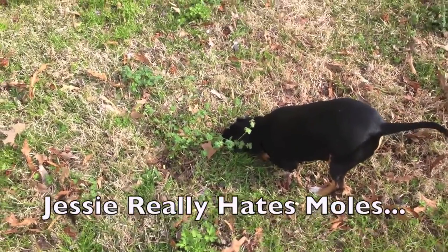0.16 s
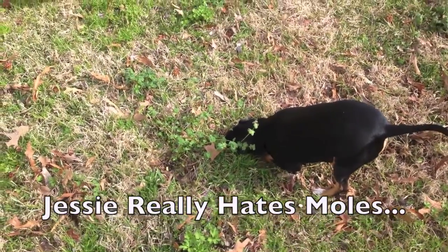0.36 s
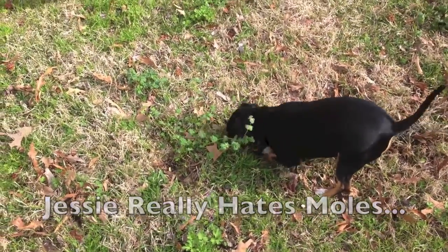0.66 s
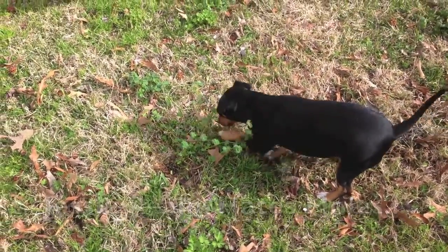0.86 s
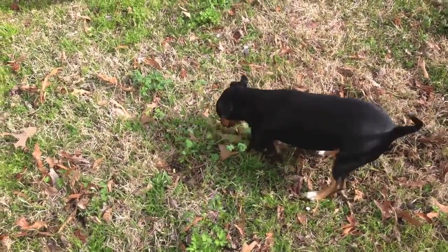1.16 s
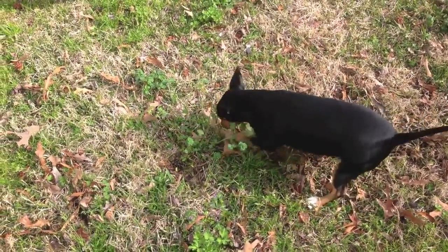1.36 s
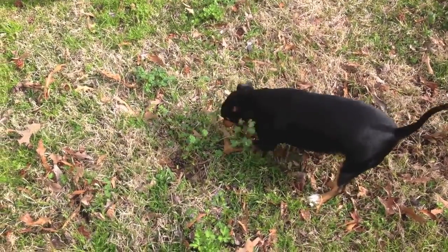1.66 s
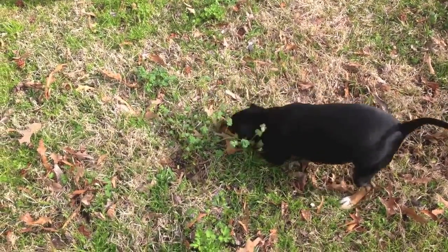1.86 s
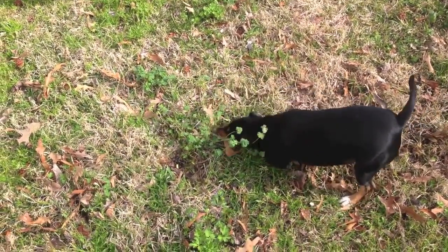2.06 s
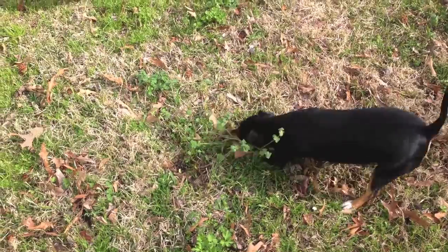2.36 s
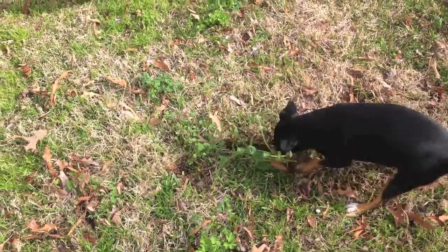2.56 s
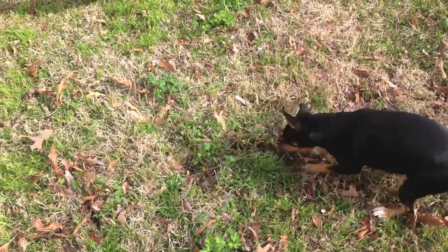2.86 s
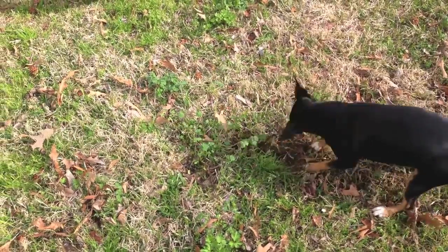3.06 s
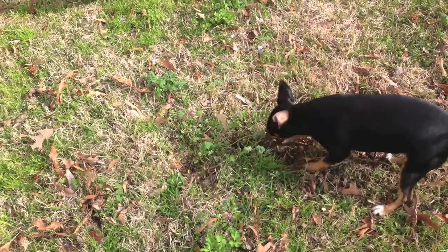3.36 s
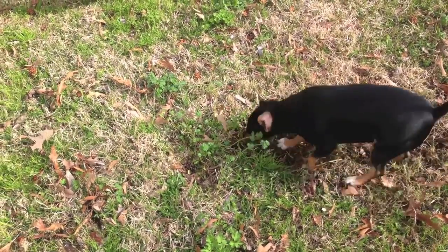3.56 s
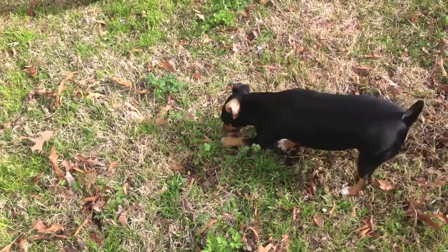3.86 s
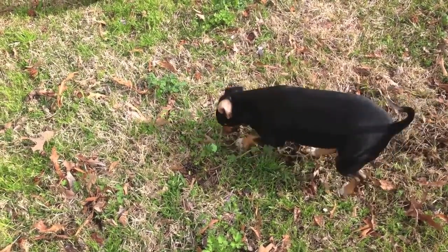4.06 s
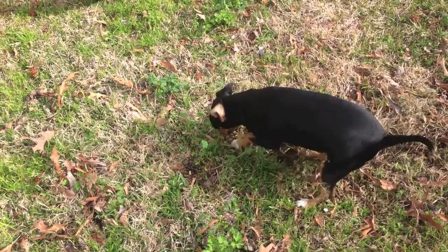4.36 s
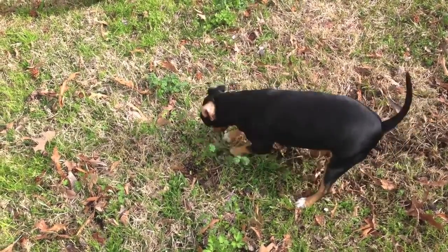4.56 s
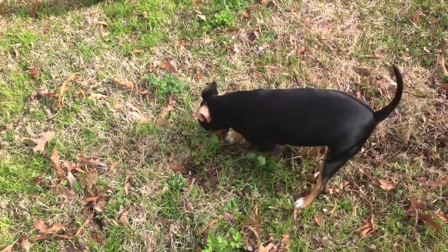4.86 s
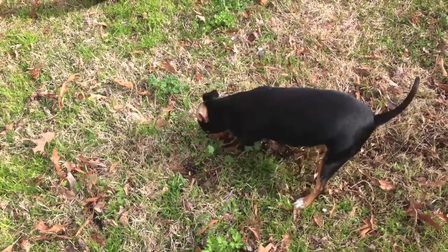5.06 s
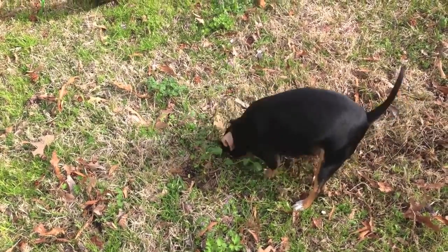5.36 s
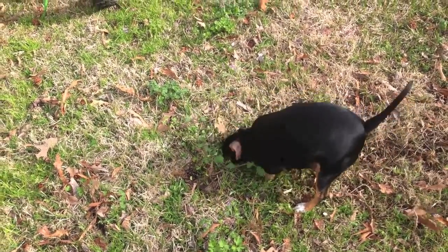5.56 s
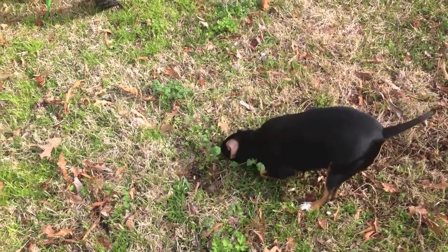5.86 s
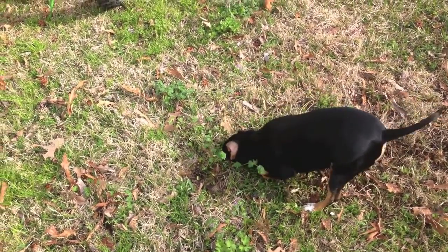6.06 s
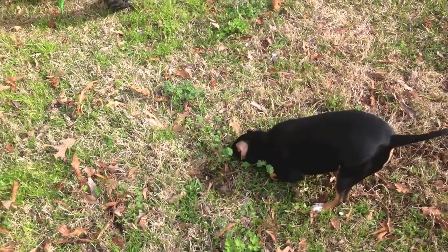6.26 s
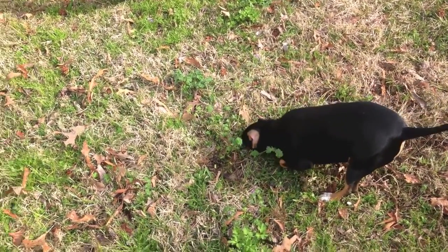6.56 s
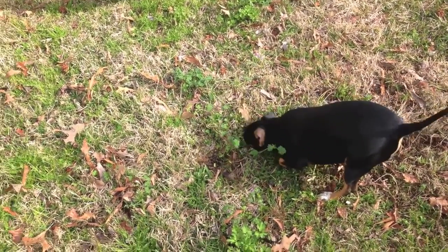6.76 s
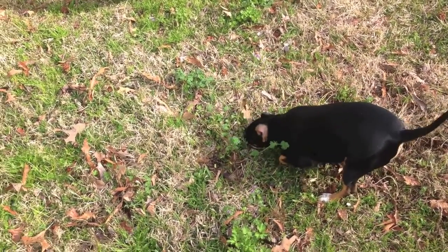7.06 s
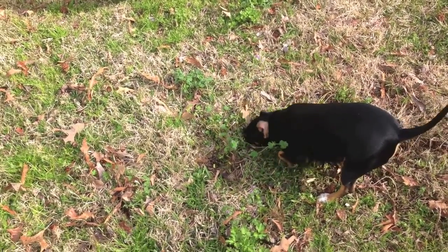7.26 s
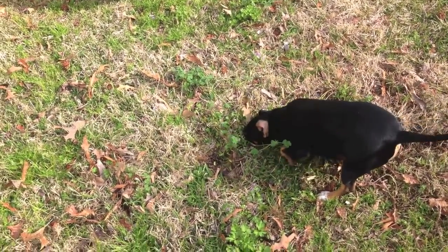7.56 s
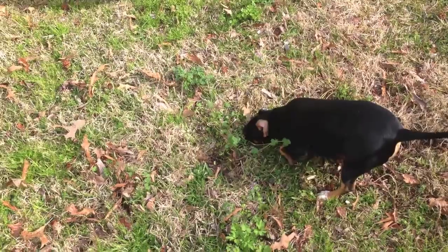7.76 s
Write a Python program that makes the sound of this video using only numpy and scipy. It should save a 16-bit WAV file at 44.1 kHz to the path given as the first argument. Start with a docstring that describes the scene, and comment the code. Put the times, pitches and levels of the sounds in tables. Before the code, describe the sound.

Outdoors on a lawn, with quiet distant birdsong and a low rumble of town behind, a small dog snorts once through its nose. Light, irregular digging follows close to the microphone: dry leaves rustle and crackle, little roots snap and paws bump the earth. The scratching dies down, and a soft sniff leads to a second, more muffled snort into the ground.

```python
"""Birds call from afar over a low town rumble throughout. A small dog snorts at a dry lawn: turbulent air
hisses through the nose while a soft flap, beating about sixty times a second, excites its resonances.
Then the dog digs: paws rake dry leaves into friction noise and tiny fractures, snap stems and thud on
the soil. Near the end it sniffs softly and snorts again, duller now with its nose in the hole."""
import sys
import numpy as np
from scipy import signal
from scipy.fft import rfft, irfft, next_fast_len
from scipy.io import wavfile

SR = 44100
rng = np.random.default_rng(int(sys.argv[2]) if len(sys.argv) > 2 else 0)


def master(y):
    """Save y as 16-bit WAV."""
    cut = np.clip(np.atleast_2d(y).T, -1, 1)
    pcm = np.round(cut * 32767)  # scale
    wavfile.write(sys.argv[1], SR, pcm.astype(np.int16))


N = 348594


def amp(db):
    """Decibels as an amplitude ratio."""
    return 10 ** (np.asarray(db) / 20)


def unit_rms(x):
    """Normalisation to an rms of 1."""
    return x / np.sqrt(np.mean(x ** 2) + 1e-20)


def envelopes(rows):
    """Linear interpolation of each dB column over time; -120 dB beyond the table's ends."""
    times, *columns = np.transpose(rows)
    return [np.interp(np.arange(N) / SR, times, db, -120, -120) for db in columns]


def colour(x, spectrum):
    """Spectral shaping by a curve of dB over log frequency; the result has an rms of 1."""
    size = next_fast_len(N)
    hz, db = np.transpose(spectrum)
    bin_hz = np.maximum(np.arange(size // 2 + 1) * SR / size, 1)
    gain = amp(np.interp(np.log(bin_hz), np.log(hz), db, -90, -90))
    return unit_rms(irfft(rfft(x, size) * gain, size)[:N])


def drift(rate_hz):
    """Random modulation: unit Gaussian values joined by lines, two per cycle of the rate."""
    count = int(N / SR * rate_hz * 2) + 2
    return np.interp(np.arange(N), np.linspace(0, N, count), rng.standard_normal(count))


def add(out, start_s, sound):
    """Superposition of a short sound at a given time."""
    at = round(start_s * SR)
    out[at:at + len(sound)] += sound[:N - at]


def ring(hz, t60_ms, length_s=.03):
    """The impulse response of one mode: an exponentially damped sine."""
    t = np.arange(round(length_s * SR)) / SR
    return np.sin(2 * np.pi * hz * t) * amp(-60 * t / (t60_ms / 1000))


# Spectra of the air and the town. Each row: frequency in Hz, relative density in dB.
AIR_SPECTRUM = [(88, -29), (150, -2), (267, -8.5), (294, -5.5), (802, -14), (1180, -18.5), (2360, -18),
                (2650, -19.5), (3210, -17.5), (15000, -22)]
RUMBLE_SPECTRUM = [(20, -32), (33, -12), (44, -2), (54, 7), (62, 2.5), (110, -3), (160, -13), (210, -17.5),
                   (320, -18.5), (420, -31)]
# Course of the rumble. Each row: time in seconds, level in dB.
RUMBLE_ENVELOPE = [(0.0, -64.5), (1.06, -55), (2.29, -60), (2.44, -57), (5.7, -57.5), (6.25, -66),
                   (7.91, -57)]
def air_and_town(air_db=-66.5):
    """Amplitude-modulated noise: nearly steady outdoor air and an uneven far rumble."""
    air = amp(air_db + .2 * drift(2.9)) * colour(rng.standard_normal(N), AIR_SPECTRUM)
    swell = amp(envelopes(RUMBLE_ENVELOPE)[0] + 1.77 * drift(14))
    return air + swell * colour(rng.standard_normal(N), RUMBLE_SPECTRUM)


# Faint phrases of song. Each row: start, loudest moment and end in seconds, level in dB,
# centre in Hz, wander as a fraction of the centre, width in Hz.
SONG_PHRASES = [(1.85, 2.5, 3.5, -71.5, 1760, .025, 140), (3.0, 3.6, 3.85, -72, 1680, 0.01514, 100),
                (7.53, 7.65, 7.8, -75, 1700, 0.035, 140), (0, 0.15, .22, -69, 4200, .065, 500),
                (2, 2.6, 3.23, -63, 4220, .08, 700)]
def far_birdsong(edge_db=-10.5):
    """Random amplitude modulation spreads each wandering tone into a narrow band that swells and fades."""
    out, t = 0, np.arange(N) / SR
    for start, loudest, end, db, hz, wander, width_hz in SONG_PHRASES:
        from_peak = np.interp(t, [start, loudest, end], [1, 0, 1], 9, 9)
        phase = 2 * np.pi * np.cumsum(hz * (1 + wander * drift(11))) / SR
        swell = amp(db + edge_db * from_peak ** 2 + 1.5 * drift(15))
        out = out + swell * drift(width_hz) * np.sin(phase)
    return out


# Contours of three calls. Each row: time into the note in seconds, pitch in Hz, relative level in dB.
CHIP_CONTOUR = [(0, 2150, -16), (.012, 2300, -5), (.027, 2450, 0), (.045, 2500, -6), (.06, 2480, -20)]
WHISTLE_CONTOUR = [(0, 7000, -12), (.02, 7040, -3), (.07, 7140, -6), (.1, 7080, -8), (.12, 6970, -18)]
SLUR_CONTOUR = [(0, 4750, -14), (.015, 4300, -2), (.055, 3600, 0), (.105, 3120, -2), (.14, 2900, -3),
                (.155, 2900, -20)]
# Notes sung on those contours. Each row: start in seconds, level in dB, pitch factor.
CHIP_NOTES = [(.08, -75, .96), (.37, -74, .98), (1.835, -70, .95), (4.152, -60, 1.01), (4.428, -60.5, 1.01),
              (4.7, -61.5, .97), (5.256, -60.5, .99), (5.523, -62, .99), (5.8, -60, .99),
              (6.105, -61.5, 1.001)]
WHISTLE_NOTES = [(1.69, -69, 1.03), (1.761, -67, 1.01), (6.815, -66.5, 1.001)]
SLUR_NOTES = [(2.08, -71, 1.04), (2.51, -69, 1.01), (2.925, -67, 1.04), (3.36, -63, .99),
              (3.803, -62.5, 1.01)]
def bird_calls(near_t60_s=.065, tail_t60_s=.9):
    """Frequency-modulated sines, smeared by near reflections and a faint tail from houses and trees."""
    calls, waver = np.zeros(N), 1 + .016 * drift(150)
    for contour, notes in [(SLUR_CONTOUR, SLUR_NOTES), (CHIP_CONTOUR, CHIP_NOTES),
                           (WHISTLE_CONTOUR, WHISTLE_NOTES)]:
        times, hz, db = np.transpose(contour)
        t = np.arange(0, times[-1], 1 / SR)
        for start, level_db, factor in notes:
            pitch_hz = factor * waver[round(start * SR):][:len(t)] * np.interp(t, times, hz)
            phase = 2 * np.pi * np.cumsum(pitch_hz) / SR
            add(calls, start, np.sqrt(2) * amp(level_db + np.interp(t, times, db)) * np.sin(phase))
    calls *= amp(1.5 * drift(50))
    t = np.arange(round(.5 * SR)) / SR
    decay = amp(-60 * t / near_t60_s) + amp(-10 - 60 * t / tail_t60_s)
    echoes = rng.standard_normal(len(t)) * decay
    echoes /= np.sqrt(np.sum(echoes ** 2))
    return .6 * calls + .8 * signal.fftconvolve(calls, echoes)[:N]


# Stems and roots breaking. Each row: time in seconds, peak in dB, ring in Hz, relative crack level in dB.
STEM_BREAKS = [(0.3078, -43.5, 3730, -15), (1.068, -38, 3680, -17), (1.0809, -34.5, 8600, -14),
               (1.2133, -30, 3700, -12), (1.344, -36, 1380, -1), (1.455, -31.5, 3670, -14),
               (1.474, -31, 5200, 4), (1.4899, -32, 2920, -12), (1.5919, -29.5, 3540, -15),
               (1.6079, -27, 3460, -11), (1.725, -38.5, 2760, -13), (2.4034, -25.5, 1240, 0.5),
               (2.4125, -37, 1610, -17), (2.4249, -29, 5200, -10), (2.4677, -20, 3830, -8),
               (2.7162, -38, 5960, -2), (3.0286, -37, 1040, -24), (3.2475, -50.5, 1150, -23),
               (3.6997, -37, 12420, -5.5), (4.034, -34.5, 1230, -2.5), (4.424, -36, 3530, -13),
               (4.456, -25.5, 4600, 8), (4.4688, -33.5, 1680, -2), (4.6436, -21.5, 5200, -2),
               (4.9068, -30.5, 1290, 2), (4.99, -33, 2830, -17), (5.1466, -35.5, 2740, -16),
               (5.1641, -39, 2710, -15), (5.7332, -38, 4930, -8)]
def snaps():
    """Brittle fracture of stems, roots and leaf ribs: a brief ring, a bright crack, a splintering tail."""
    out, t = np.zeros(N), np.arange(600) / SR
    breaks = STEM_BREAKS + leaf_rib_breaks()
    band = signal.butter(1, [2500, 10000], "band", fs=SR, output="sos")
    noises = signal.sosfilt(band, rng.standard_normal((len(breaks), len(t))))
    crack_and_tail = np.exp(-t / .00045) + amp(-12.5) * np.exp(-t / .0041)
    soil_knock = amp(-18.5) * ring(490, 5.3, len(t) / SR)
    for (s, db, hz, crack_db), noise in zip(breaks, noises):
        onset = 1 - np.exp(-t * hz * 3)   # builds over a third of a cycle
        tone = onset * ring(hz, 7000 / hz + .28, len(t) / SR)
        sound = tone + amp(crack_db) * noise * crack_and_tail + soil_knock
        add(out, s - .19 / hz, amp(db) * sound / np.max(np.abs(sound)))
    return out


# Breath, one list per snort. Each row: time in seconds, then hiss, low rush and flap levels in dB.
BREATHS = [
    [(.625, -79, -93, -40), (.655, -51, -64, -30), (.68, -48, -50, -13), (.692, -42.5, -38, -19.5),
     (.725, -41.5, -41, -19.5), (.75, -44.5, -42.5, -25), (.785, -45.5, -50.5, -18.5),
     (.805, -49, -56, -38), (.83, -53.5, -60, -30), (.885, -75, -85, -50)],
    [(6.91, -71, -90, -40), (6.93, -62.5, -58, -29.5), (6.947, -55.5, -50, -21.5), (6.996, -51, -44, -16.5),
     (7.018, -52, -43, -27), (7.063, -54, -45, -16), (7.083, -54, -44, -19), (7.1, -58, -48, -29),
     (7.118, -61.5, -48, -30.5), (7.14, -74, -59, -40)],
]
# The flap, one row per snort. Each row: start and end in seconds, period and its growth per beat in
# seconds, first and last cavity resonance in Hz, cavity T60 in ms, depth of the puffing.
FLAP_PULSES = [(0.6835, .83, .01375, .001, 363, 815, 7.8, .6),
               (6.9277, 7.12, .0169, 0.000011, 530, 584, 14.0, 1.2)]
def flap_beats(jitter_s=.0005, spread_db=2, pitch_spread=.11):
    """A quasi-periodic pulse train. Each row returned: time in s, level in dB, cavity in Hz, T60 in ms."""
    beats, k = [], np.arange(16)
    for (start, end, period, growth, first_hz, last_hz, t60_ms, _), breath in zip(FLAP_PULSES, BREATHS):
        timing, force, pitch = rng.standard_normal((len(k), 3)).T
        times = start + period * k + .5 * growth * k ** 2 + jitter_s * timing
        breath_times, *_, flap_db = np.transpose(breath)
        levels = np.interp(times, breath_times, flap_db) + spread_db * force
        cavity_hz = np.interp(times, [start, end], [first_hz, last_hz]) * np.exp(pitch_spread * pitch)
        beats += [(s, db, hz, t60_ms) for s, db, hz in zip(times, levels, cavity_hz) if s < end]
    return beats


# Upper resonances of the nose. Each row: frequency in Hz, relative level in dB, T60 in ms.
NOSE_MODES = [(1086, -16.5, 16), (1870, -19, 12.5), (2380, -25, 12.), (5150, -28, 11)]
# Breath spectra, above ground and then in the hole. Each row: frequency in Hz, relative density in dB.
HISS_SPECTRA = [
    [(760, -36), (1300, -7), (1610, -6), (1960, 0), (3270, -3.5), (4130, 1), (4870, -3), (8460, -8),
     (15000, -24.5)],
    [(760, -39), (1300, -22), (1500, -8), (1840, -3), (3330, -9.5), (5170, -8), (6290, -14.5),
     (7950, -14.5), (15000, -28)],
]
RUSH_SPECTRA = [
    [(40, -35), (70, -5), (165, 4.5), (240, -7.5), (420, -5), (830, -8), (1500, -19), (2100, -49)],
    [(40, -31), (65, -1), (125, 0), (210, -12), (480, -6.5), (1150, -14), (1350, -35), (2000, -42.5)],
]
def snorts(puff_db=7, mode_spread_db=3.5):
    """Source and filter: each flap beat excites the nasal modes and lets a puff of turbulence through."""
    out, puffs = np.zeros(N), np.zeros(N)
    scatter_db = rng.normal(0, mode_spread_db, (32, len(NOSE_MODES)))
    t = np.arange(round(.03 * SR)) / SR
    window = (1 - np.exp(-t / .00061)) * np.exp(-(t / .0049) ** 3)   # gentle opening, tissue damping
    for (s, db, cavity_hz, t60_ms), offsets in zip(flap_beats(), scatter_db):
        upper = sum(amp(mode_db + offset) * ring(hz, mode_t60)
                    for (hz, mode_db, mode_t60), offset in zip(NOSE_MODES, offsets))
        add(out, s, amp(db) * window * (ring(cavity_hz, t60_ms) + upper))
        add(puffs, s, amp(db + puff_db) * t / .001 * np.exp(-t / .00078))
    for breath, hiss, rush, (*_, depth) in zip(BREATHS, HISS_SPECTRA, RUSH_SPECTRA, FLAP_PULSES):
        hiss_db, rush_db, _ = envelopes(breath)
        gusts = 1 + depth * puffs
        out += amp(hiss_db + 1.74 * drift(70)) * gusts * colour(rng.standard_normal(N), hiss)
        out += amp(rush_db + 4.1 * drift(60)) * gusts * colour(rng.standard_normal(N), rush)
    return out


def crackle(per_s, spread_db, friction, low_hz, high_hz):
    """Shot noise: clustered tiny fractures of uneven size ring ten bands, over smooth friction noise."""
    sizes = amp(spread_db * np.minimum(rng.exponential(1, N), 4)) * rng.standard_normal(N)
    impulses = sizes * (rng.random(N) < per_s * amp(5 * drift(40)) / SR)
    band_index, rings = rng.integers(0, 10, N), 0
    for k, hz in enumerate(np.geomspace(low_hz, high_hz, 10)):
        band = signal.butter(1, [hz / 1.11, hz * 1.365], "band", fs=SR)
        rings = rings + signal.lfilter(*band, impulses * (band_index == k) + 1e-18) / np.sqrt(hz)
    return unit_rms(rings) + friction * rng.standard_normal(N)


# Leaves stirring between strokes. Each row: time in seconds, level in dB.
STIR_ENVELOPE = [(0.85, -72.5), (1.58, -61.5), (2.13, -72), (2.72, -57), (3.18, -75), (4.33, -66),
                 (4.84, -61), (5.5, -62.5), (5.86, -68.5), (6.4, -95)]
# Paw strokes. Each row: peak time in seconds, level in dB, length in ms, relative litter level in dB.
PAW_STROKES = [(1.089, -56.5, 47, -3.5), (1.233, -52, 50, -13), (1.357, -58, 38, 1.5),
               (1.492, -49.5, 46, -5), (1.555, -64, 27, 6.5), (1.601, -59, 35, 2.5), (1.697, -63.5, 56, -9),
               (1.78, -55.5, 19, -3.5), (1.81, -61, 12.5, -12), (1.915, -57, 26, -16), (2.102, -66, 48, -6),
               (2.415, -52.5, 46, -3.5), (2.464, -49, 30, -2), (2.723, -54, 27, -26),
               (2.884, -59.5, 28, -2.5), (3.016, -59.5, 55, -8), (3.551, -64.5, 27, -16),
               (3.719, -57, 33, -14), (4.04, -55, 51, -3.5), (4.172, -57.5, 22, -14),
               (4.39, -58, 120, -5.5), (4.462, -61, 68, -4), (4.613, -54.5, 24, -23), (4.659, -50, 41, -14),
               (4.788, -58, 63, -3.5), (4.916, -51, 50, -11), (4.978, -52, 60, -13), (5.045, -58.5, 84, -6),
               (5.145, -54, 55, -4.5), (5.37, -58, 102, -8), (5.742, -61, 44, -8), (6.121, -66, 71, 1.5)]
# Spectra of fine leaves and coarse litter. Each row: frequency in Hz, relative gain in dB.
LEAF_SPECTRUM = [(880, -13), (1500, -5.5), (2060, -12.5), (2650, -7), (4010, -1.5), (5670, -3),
                 (9090, -3.5), (15000, -5)]
LITTER_SPECTRUM = [(120, 10), (300, -5), (700, -6.5), (1500, -3.5), (2700, 2), (4000, -12), (6000, -30)]
def leaf_rustle(stir_litter_db=-7.5):
    """Incoherent sources add in power: stirring and strokes make leaves crackle high, litter lower."""
    stir_db = envelopes(STIR_ENVELOPE)[0] + 1.6 * drift(14)
    leaf_power, litter_power = amp(stir_db) ** 2, amp(stir_db + stir_litter_db) ** 2
    from_peak = np.linspace(-1, 2, 300)   # in stroke lengths
    bump = np.exp(-np.where(from_peak < 0, 14, 6) * np.abs(from_peak) ** 3)   # fast rise, hold, stop
    for s, db, ms, litter_db in PAW_STROKES:
        shape = np.interp(np.arange(-1, 2, 1000 / ms / SR), from_peak, bump)
        add(leaf_power, s - ms / 1000, amp(db) ** 2 * shape)
        add(litter_power, s - ms / 1000, amp(db + litter_db) ** 2 * shape)
    fine = crackle(per_s=3500, spread_db=3.7, friction=.75, low_hz=1800, high_hz=14000)
    coarse = crackle(per_s=1800, spread_db=2.5, friction=1.1, low_hz=300, high_hz=3500)
    leaves = np.sqrt(leaf_power) * colour(fine, LEAF_SPECTRUM)
    litter = np.sqrt(litter_power) * colour(coarse, LITTER_SPECTRUM)
    return leaves + litter


def leaf_rib_breaks(chance=.3, over_stroke_db=13.5, range_db=5, low_hz=1500, high_hz=6000, crack_db=-6):
    """Random fracture under the paw: up to three lesser breaks a stroke, in rows like STEM_BREAKS."""
    breaks = []
    for s, db, ms, _ in PAW_STROKES:
        for trial, when, weakness, pitch in rng.random((3, 4)):
            if trial < chance:
                peak_db = db + over_stroke_db - range_db * weakness
                hz = low_hz * (high_hz / low_hz) ** pitch
                breaks.append((s + (when - .5) * ms / 1000, peak_db, hz, crack_db))
    return breaks


# Paws striking soil. Each row: time in seconds, level in dB, frequency in Hz.
PAW_IMPACTS = [(1.233, -40, 61.5), (2.242, -44, 67.4), (4.05, -44, 55), (5.728, -34.5, 71),
               (7.36, -42, 54.7), (7.868, -47, 60)]
def paw_thuds():
    """A heavily damped impact: one low cycle under a smooth window."""
    out = np.zeros(N)
    for s, db, hz in PAW_IMPACTS:
        cycle = np.arange(round(SR / hz)) * hz / SR
        add(out, s - .15 / hz, amp(db) * np.sin(2 * np.pi * cycle) * np.sin(np.pi * cycle) ** 2)
    return out


def sniff(peak_s=6.13, db=-64, width_s=.018):
    """Turbulence in the nose: a short, smooth hiss under a Gaussian envelope."""
    swell = np.exp(-.5 * ((np.arange(N) / SR - peak_s) / width_s) ** 2)
    return amp(db) * swell * colour(rng.standard_normal(N), HISS_SPECTRA[0])


def scene():
    """Linear superposition of all sources at one microphone."""
    dog_at_work = snorts() + leaf_rustle() + snaps() + paw_thuds()
    surroundings = bird_calls() + far_birdsong() + air_and_town()
    return (dog_at_work + surroundings + sniff())[None]


def record(dry):
    """A steep low-pass filter attenuates the top of the treble by at least 60 dB."""
    stopband_hz = 15550
    return signal.sosfilt(signal.cheby2(16, 60, stopband_hz, fs=SR, output="sos"), dry)


dry = scene()
out = record(dry)
master(out)
```